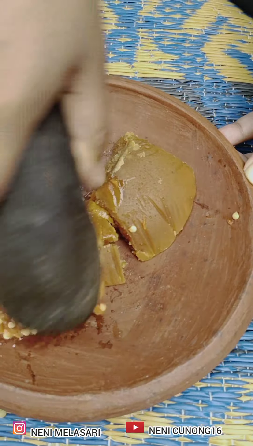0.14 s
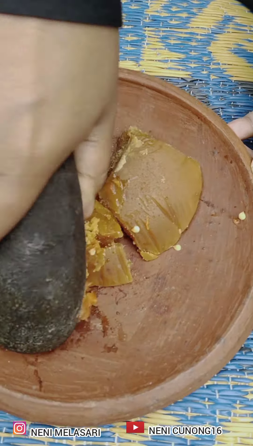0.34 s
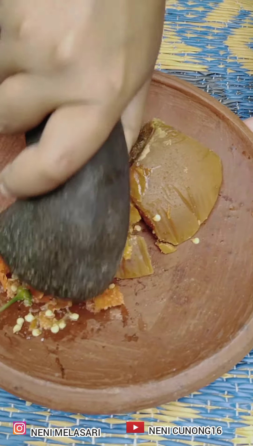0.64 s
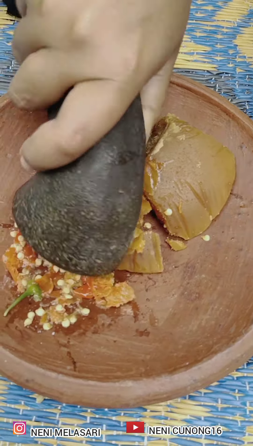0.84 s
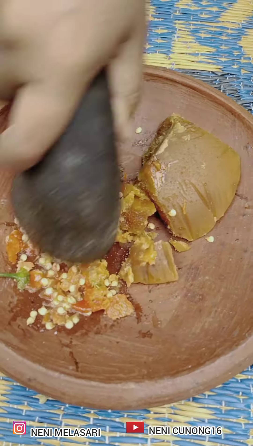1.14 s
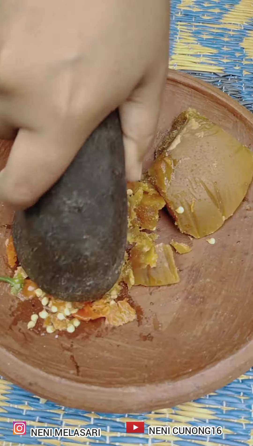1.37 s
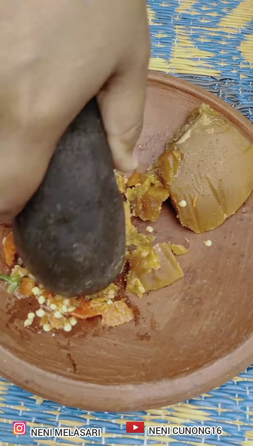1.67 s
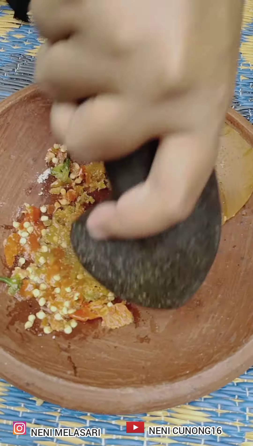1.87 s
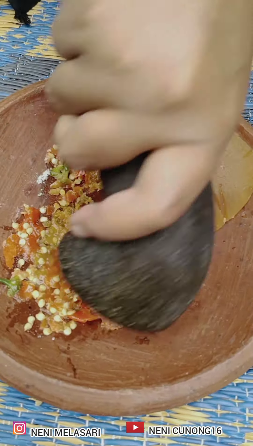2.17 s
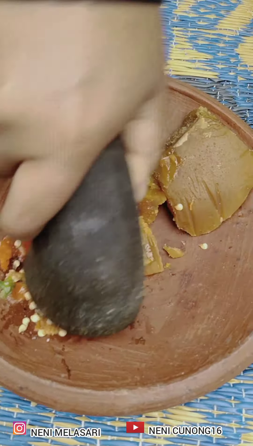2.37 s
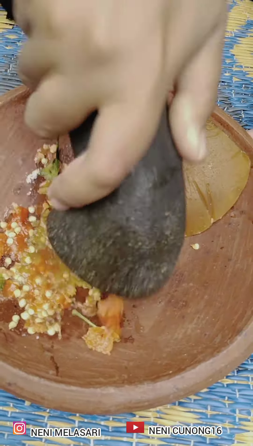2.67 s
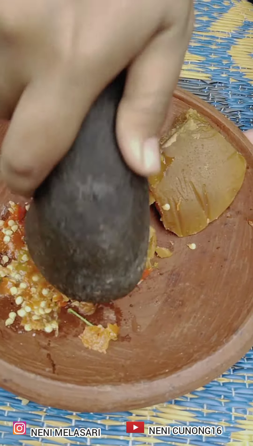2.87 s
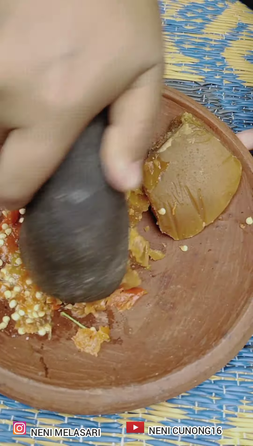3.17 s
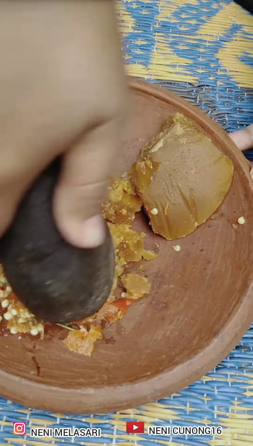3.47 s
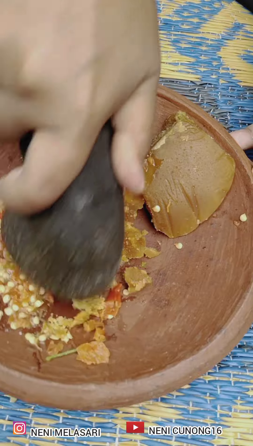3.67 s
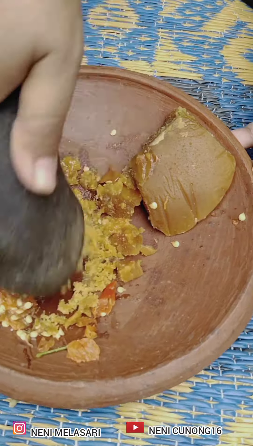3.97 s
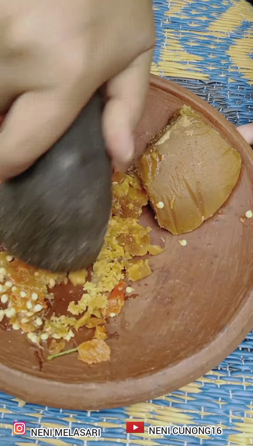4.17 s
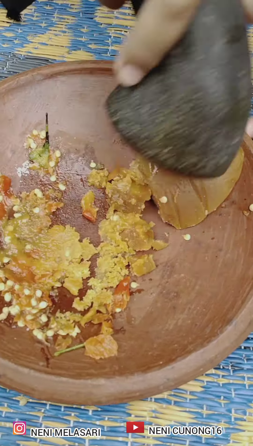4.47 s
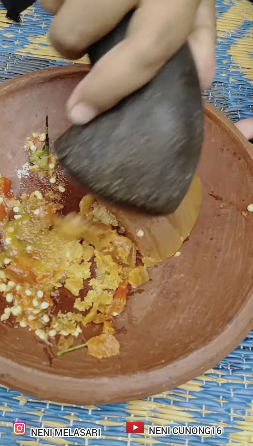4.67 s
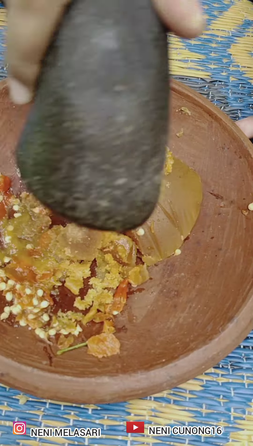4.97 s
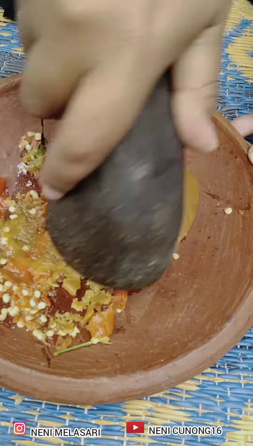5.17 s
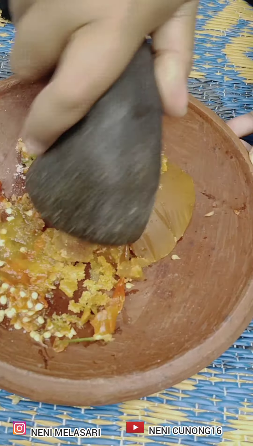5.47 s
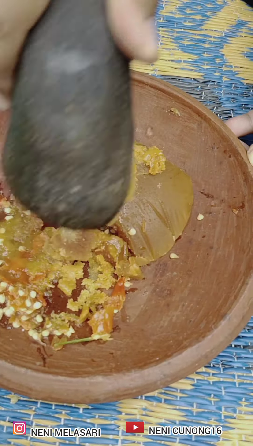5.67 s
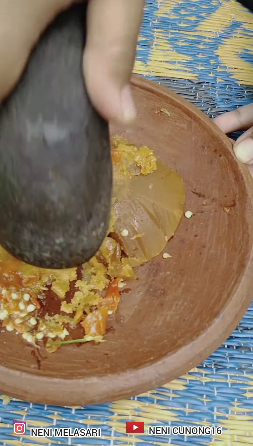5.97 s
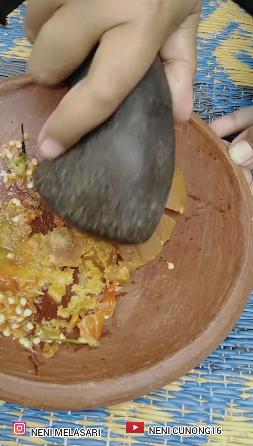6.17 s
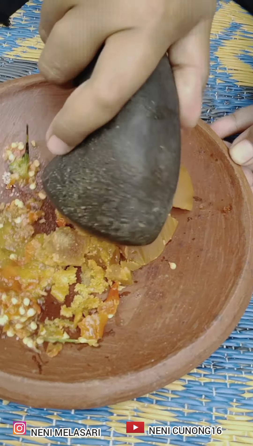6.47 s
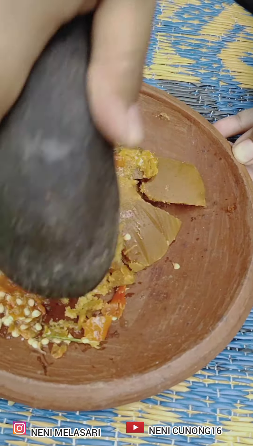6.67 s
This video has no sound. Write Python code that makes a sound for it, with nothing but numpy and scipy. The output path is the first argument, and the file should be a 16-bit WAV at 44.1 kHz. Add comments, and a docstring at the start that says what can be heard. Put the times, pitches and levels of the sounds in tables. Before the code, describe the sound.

Close up in a small, fairly dry room, a stone pestle works food in a shallow clay mortar over a soft low rumble and faint hiss. From 0 to 2.5 seconds it makes short, gritty, uneven scrapes and rubs, with small ticks and crunching grains, strongest around 1.2 to 1.7. A thin, rough animal cry sounds very faintly far away at about 0.5 to 0.9. At 2.8 a sharp, bright clay knock stands out, with a weaker one at 3.1. Scraping returns from 3.1 to 4.3, crunchier near 3.8, then a brief scrape at 4.7. Five hard, dead, abrupt knocks follow at 5.2, 5.5, 5.9, 6.2 and 6.6, the loudest overloading slightly, each with a tiny room reflection and near quiet between. Barely audible soft distant tones drift around 2.9, 3.9 and 5.4 to 6.2 seconds.

```python
"""A stone pestle crushes chilli, seeds and palm sugar in a shallow clay mortar, close to the microphone.
Blows set the damped modes of the dish ringing; gritty strokes are random grains that excite the same modes.
Late on, the pestle pounds a lump with five hard, dead knocks that overload the microphone.
A small room answers with filtered noise; behind it lie a low rumble and faint hiss, both shaped noise.
Far away an animal calls once, a rough tone with one overtone, and a few soft sine tones sound."""
import sys
import numpy as np
from scipy import signal
from scipy.fft import rfft, irfft
from scipy.io import wavfile

SR = 44100
rng = np.random.default_rng(int(sys.argv[2]) if len(sys.argv) > 2 else 0)


def store_wav(level_fs):
    """Save 16-bit WAV to argv[1]."""
    pcm = np.round(np.clip(np.atleast_2d(level_fs), -1, 1) * 32767)
    wavfile.write(sys.argv[1], SR, pcm.T.astype(np.int16))


N = 301644


def pounding(lead_in_rise_s=0.0032, lead_in_db=-26.5):
    """All blows of the pestle; a faint noise swells briefly before each."""
    # Blows of the pestle. Each row: start in seconds, length of the crunch in seconds, strength in dB,
    # hardness in dB per octave, pitch in Hz that the struck spot favours or mutes, by how much in dB,
    # note left ringing in Hz, its level in dB.
    blows = [(0.289, 0.0061, -54.5, 1.5, 5900, 16, 3850, -48),
             (0.3011, 0.0027, -47, -2.5, 2130, 16, 2410, -32),
             (2.495, 0.0054, -46, 2.7, 5940, 11, 3830, -40),
             (2.7964, 0.0076, -28, -1.5, 3570, -5.5, 2165, -12),
             (2.811, 0.0023, -22.5, -2, 620, -22.5, 3920, -24),
             (3.0986, 0.0026, -34, -.5, 1290, -4, 4000, -33),
             (3.105, 0.0084, -35, -0.9, 2000, -5.5, 3940, -15.5),
             (3.1357, 0.00039, -47, -3.5, 1290, 11, 1410, -33),
             (3.7367, 0.0045, -35, 6.5, 596, -15, 3950, -36), (4.026, 0.0013, -54, 8, 2640, -22, 3950, -50),
             (4.6091, 0.0067, -47.5, -2, 1090, 15, 1476, -38),
             (4.6179, 0.0018, -55, -2, 1000, 10, 600, -42),
             (5.1646, 0.0038, -25, -2.36, 556, 2.5, 2390, -25),
             (5.5224, 0.0022, -19.5, -2.5, 920, -9.5, 1703, -10),
             (5.886, 0.0028, -26, -4.5, 2600, -8, 1140, -34),
             (6.2373, 0.0032, -21, -1.5, 1470, 4, 1813, -19),
             (6.5683, 0.0023, -20, -1, 5000, -8.5, 1820, -8.5),
             (6.6215, 0.0026, -55, -3, 1560, 7, 2060, -49)]
    out = np.zeros(N)
    ahead = np.arange(SR // 100)[::-1] / SR  # time left before the stone lands
    for s, *touch in blows:
        lead_in = rng.standard_normal(len(ahead)) * np.exp(-ahead / lead_in_rise_s)
        landing = ahead == 0
        force = landing + amp(lead_in_db) * lead_in / np.linalg.norm(lead_in)
        add(out, s - ahead[0], signal.fftconvolve(blow(*touch), force))
    return out


def blow(crunch_s, strength_db, hardness, spot_hz, spot_db, note_hz, note_db,
         crack_db=-1, push_db=-3, grip=0.55, passes=3):
    """A push, a crunch of contact and the short ring of the dish; bare clay makes it bright, food dull."""
    # Contact noise. Each row: frequency in Hz, relative level in dB per Hz.
    crack = [(60, -45), (150, -2), (400, -6), (1000, -8.5), (3000, 0), (4600, 2.5), (6000, -5), (9000, -9)]
    # Food softens the top of every blow. Each row: frequency in Hz, gain in dB.
    cushion = [(9000, 13.5), (11000, -19), (15500, -19)]
    # Colour shared by all blows. Each row: frequency in Hz, relative level in dB.
    blow_colour = [(400, 0), (750, -5), (1100, 3.5), (1760, -2), (2300, 0.5), (2900, 2.5), (3400, -3),
                   (3950, 5), (4700, -2.5), (7000, -7)]
    pivot_hz, spot_octaves = 1620, 0.86  # hardness tilts about this pitch; width of the spot's emphasis
    note_rise_s, note_t60_s = 0.0033, 0.04

    t = np.arange(SR // 8) / SR
    u = t / max(crunch_s, 1 / SR)
    grit = band(rng.standard_normal(len(t)), 800, 14000, order=2)
    crunch = evened(grit * np.sqrt(u) * np.exp(-1.5 * u))
    push = evened(1. * (t == 0))
    contact = colour(amp(push_db) * push + amp(crack_db) * crunch, crack)
    ring = dish(t, spread_db=2, grip=grip)
    sound = colour(band(ring + contact, 140, 20000, order=2), cushion)

    hz, colour_db = np.transpose(blow_colour)
    spot = np.exp(-(np.log2(hz / spot_hz) / spot_octaves) ** 2)
    levels_db = strength_db + colour_db + hardness * np.log2(hz / pivot_hz) + spot_db * spot
    edges_hz = [150, 650, 850, 1550, 2000, 2550, 3200, 3600, 4300, 5200, 11000]
    attack = round(.008 * SR)
    for _ in range(passes):  # each pass brings the registers closer to their strength during the attack
        now_db = []
        for lo_hz, hi_hz in zip(edges_hz, edges_hz[1:]):
            power = np.mean(band(sound[:attack], lo_hz, hi_hz) ** 2)
            now_db.append(10 * np.log10(power))
        sound = colour(sound, list(zip(hz, levels_db - now_db)))

    swell_in = 1 - np.exp(-(t / note_rise_s) ** 2)
    note = swell_in * np.exp(-np.log(1000) * t / note_t60_s) * np.sin(2 * np.pi * note_hz * t)
    return sound + amp(note_db) * note


def dish(t, spread_db, grip=0, whole_hz=1600, detune=0, hold=1):
    """The dish's damped modes answer one touch; a pestle pressed down chokes the high ones."""
    # Modes of the clay dish, damped by food and mat. Each row: frequency in Hz before detuning,
    # relative level in dB, t60 in seconds before hold and grip act on it.
    modes = [(312, -18.5, 0.011), (548, 1.5, 0.012), (686, -20, 0.014), (970, 3, 0.011),
             (1199, -1.5, 0.016), (1470, 0, 0.015), (1747, -1, 0.032), (2154, -1.5, 0.025),
             (2390, 5.5, 0.013), (2750, -3.5, 0.037), (2895, 5, 0.017), (3120, -28, 0.0083),
             (3566, -10, 0.012), (3940, -1, 0.014), (4091, -2.5, 0.015), (4420, -8, 0.013),
             (4686, -12.5, 0.018), (4990, -5, 0.0094), (5404, -23.5, 0.019), (5730, -5.5, 0.012),
             (6270, -11.5, 0.0058), (6720, -11, 0.0063), (8210, -17.5, 0.0027)]
    hz, db, t60 = np.transpose(modes)[:, :, None]
    signs = rng.choice([-1, 1], hz.shape)
    shape = signs * amp(spread_db * rng.standard_normal(hz.shape))  # each mode's swing at this spot
    shape = np.where(hz < whole_hz, 1, shape)  # the lower modes move the whole bottom together
    hz = hz * (1 + detune * rng.standard_normal(hz.shape))
    decay = np.log(1000) / (t60 * hold) * (1 + grip * (hz / 4000) ** 2)
    ringing = shape * amp(db) * np.exp(-decay * t) * np.sin(2 * np.pi * hz * t)
    return evened(ringing.sum(0))


def grinding(grains_per_s=3200, size_db=2.5, judder_db=0.54, dry_db=-23, spots_per_s=22, usual_hiss_db=-13,
             brighten=0.25, usual_grit_db=-15, deepen=0.33, low_db=-6, high_db=-1, grit_db=-1, hiss_db=-1,
             count=16):
    """Grains catch and break under the stone; the ring of the dish shifts as the pestle travels over it."""
    # Force of the grains. Each row: frequency in Hz, relative level in dB per Hz.
    grain_force = [(300, -20.5), (800, -5.5), (1800, -9), (3000, -1.5), (4100, 17.5), (5500, 5.5),
                   (9000, 18.5), (10500, -1), (12000, -32), (14500, -13)]
    # Hard bits crushed under the stone. Each row: centre in seconds, half length in seconds, level in dB.
    crunches = [(3.821, 0.021, -40.5), (3.944, 0.015, -42)]
    t = np.arange(N) / SR
    level, hiss, coarse = friction()

    judder = amp(judder_db * evened(band(rng.standard_normal(N), 13, 150, order=2)))
    sizes = amp(size_db * np.minimum(rng.exponential(1, N), 5)) * rng.choice([-1, 1], N)
    caught = rng.random(N) < grains_per_s / SR
    grains = sizes * caught * judder

    spot = (t * spots_per_s + rng.random(N)).astype(int) % count  # each spot hands over to the next
    ring = np.zeros(N)
    for k in range(count):
        touch = dish(t[:SR // 20], spread_db=4.5, whole_hz=3050, detune=.009, hold=1.8)
        answer = evened(colour(touch, grain_force))
        ring += signal.oaconvolve(grains * (spot == k), answer)[:N]
    rub = evened(ring) + amp(dry_db) * evened(colour(grains, grain_force))

    fine_db = brighten * np.clip(hiss - level - usual_hiss_db, -12, 12)  # finer grains excite the low modes less
    deep_db = deepen * (coarse - level - usual_grit_db)  # coarser grains excite them more
    grit = amp(coarse + grit_db)
    for s, half_s, db in crunches:
        grit = grit + amp(db) * np.exp(-((t - s) / half_s) ** 2)
    return (grit * evened(band(rub, 450, 2510))
            + amp(level + low_db - fine_db + deep_db) * evened(band(rub, 2005, 3090))
            + amp(level + high_db) * evened(band(rub, 2306, 5700))
            + amp(hiss + hiss_db) * evened(band(rub, 6840, 14000)))


def friction(step=32):
    """Levels in dB of scrape, hiss and grit: each push bites, swells or eases, and lifts; short ticks stand out."""
    # Pushes of the pestle over the food. Each row: start in seconds, length in seconds, scrape in dB,
    # growth from start to end in dB, then fine hiss and coarse grit, both in dB over the scrape.
    strokes = [(0.0, 0.011, -39, -8, -19, -23), (0.055, 0.013, -48.5, 2, -12.5, -32),
               (0.315, 0.056, -52.5, -5, -10, -1.5), (0.358, 0.038, -36.5, -2, -15, -20.5),
               (0.481, 0.036, -42.5, 11, -8, -15), (0.57, 0.094, -52.5, 2, -19, -17),
               (0.712, 0.031, -39, 8, -17, -10.5), (0.76, 0.051, -43.5, -12, -15, -7.5),
               (0.894, 0.032, -39.5, 3, -17, -18.5), (0.958, 0.16, -43.5, -7.5, -14.5, -13.5),
               (1.205, 0.02, -47.5, 11, -7, -15), (1.243, 0.066, -37, 1, -17, -15.5),
               (1.325, 0.15, -38, -2, -17, -16.5), (1.534, 0.041, -33, 13, -17.5, -20.5),
               (1.618, 0.064, -35, 3, -18, -19), (1.708, 0.084, -50.5, -18, -11, -35),
               (1.97, 0.0039, -44, 10, -23, -10.5), (2.017, 0.04, -44.5, -2, -19, -7),
               (2.167, 0.13, -45, -1, -25, -11.5), (2.374, 0.027, -54, 2, -13, -3.5),
               (2.458, 0.04, -46.5, 21, -17, -11.5), (3.134, 0.052, -46.5, -8, -15, -10),
               (3.234, 0.059, -46, 5, -17, -11), (3.365, 0.035, -44, -5.5, -18, -8),
               (3.427, 0.085, -45, 6, -13, -8.5), (3.679, 0.064, -43.5, 6, -17, -19),
               (3.755, .08, -38, 1, -17, -15.5), (3.877, .14, -43, -1.5, -11.5, -12),
               (4.103, 0.065, -35.5, 5, -14, -15.5), (4.21, 0.081, -36.5, 7, -13, -12.5),
               (4.661, 0.032, -43.5, 4, -12.5, -8.5), (4.715, 0.034, -31, 3, -20.5, -14),
               (4.775, 0.065, -51.5, 3, -29, -7), (5.215, 0.045, -50.5, 1, -38, -7),
               (6.589, 0.058, -59.5, -4, -30, 12.5)]
    # Brief ticks and sharp starts of pushes. Each row: time in seconds, scrape in dB, fine hiss in dB.
    ticks = [(0.014, -49, -43), (0.478, -40.5, -61), (0.542, -41, -52), (0.615, -57, -46.5),
             (1.206, -44, -46), (1.294, -28.5, -61), (1.536, -32, -45), (2.016, -33, -61),
             (2.457, -38.5, -58), (2.539, -40.5, -59), (3.365, -39.5, -73), (3.544, -41, -57.5),
             (3.679, -44, -53), (4.676, -34, -54)]
    bite_s, lift_s = 0.012, .015  # the scrape builds before a push and dies after it
    tick_rise_s, tick_fall_s = 0.0018, 0.013
    t = np.arange(0, N, step) / SR
    resting_db = [[-69], [-77], [-77]]  # the stone never quite stops moving in the food
    power = amp(resting_db) ** 2 * np.ones(len(t))
    for s, length, db, growth_db, hiss_db, grit_db in strokes:
        progress = np.clip((t - s) / length, 0, 1) - .5
        pressure = amp(db + growth_db * progress) * swell(t, s, length, bite_s, lift_s)
        power += (amp([[0], [hiss_db], [grit_db]]) * pressure) ** 2
    for s, db, hiss_db in ticks:
        power[:2] += (amp([[db], [hiss_db]]) * swell(t, s, 0, tick_rise_s, tick_fall_s)) ** 2
    return [np.interp(np.arange(N) / SR, t, 10 * np.log10(p)) for p in power]


def hiss_bands(rise_s=0.01, fade_s=0.033, width=0.07):
    """Short narrow bands of hiss, made of band-passed noise, linger after some blows and strokes."""
    # Short narrow bands of hiss. Each row: start in seconds, length in seconds, centre pitch in Hz, level in dB.
    rows = [(2.838, 0.12, 6720, -61.5), (2.841, 0.034, 2390, -57.5), (4.786, 0.029, 2510, -51),
            (5.54, 0.033, 1700, -55), (6.293, .07, 6500, -62), (6.595, 0.034, 2010, -51)]
    t = np.arange(N) / SR
    out = np.zeros(N)
    for s, length, hz, db in rows:
        hiss = evened(band(rng.standard_normal(N), hz / (1 + width), hz * (1 + width), order=3))
        out += amp(db) * swell(t, s, length, rise_s, fade_s) * hiss
    return out


def room(x, tail_db=-25, echo_db=-17, hollow_db=-42):
    """Near wall echoes, a faint tail that fades at its own rate in each register, and a hollow ring."""
    # Decay of the room's tail. Each row: frequency in Hz, t60 in seconds.
    tail_t60 = [(150, 0.23), (600, 0.063), (2000, 0.29), (5000, 0.27), (10000, 0.37)]
    wall_s, echo_s = .007, .008  # delay of the room's answer; time constant of the early echoes
    hollow_hz, hollow_t60_s = 572, .22
    t = np.arange(SR // 2) / SR
    hz, frame_s, z = signal.stft(rng.standard_normal(len(t)), SR, nperseg=256)
    fading = np.exp(-np.log(1000) * frame_s / read(tail_t60, hz)[:, None])
    tail = signal.istft(z * fading, SR)[1][:len(t)]
    early = rng.standard_normal(len(t)) * np.sqrt(t) * np.exp(-t / echo_s)
    hollow = np.sin(2 * np.pi * hollow_hz * t) * np.exp(-np.log(1000) * t / hollow_t60_s)
    answer = amp(tail_db) * evened(tail) + amp(echo_db) * evened(early) + amp(hollow_db) * evened(hollow)
    answer = answer / np.sqrt(len(t))
    # Colour of the whole answer: frequency in Hz, gain in dB.
    answer = colour(answer, [(150, 0), (450, -8), (600, -3), (1700, 1), (2500, -5), (4000, -5),
                             (5100, 1), (6500, -7)])
    out = np.zeros(N)
    add(out, wall_s, signal.fftconvolve(x, answer))
    return out


def far_call(overtone_db=-9, waver=0.017, flutter_db=6):
    """A far animal's thin, rough cry with one overtone; pitch and level follow one arch."""
    start_s, length_s, level_db = .48, .39, -58.5
    end_hz, arch_hz = 1016, 145  # mean pitch at the ends, and its rise in the middle
    arch = np.sin(np.pi * np.clip((np.arange(N) / SR - start_s) / length_s, 0, 1))
    jitter, flutter = (evened(band(rng.standard_normal(N), 15, 90, order=2)) for _ in range(2))
    pitch_hz = (end_hz + arch_hz * arch) * (1 + waver * jitter)
    turn = 2 * np.pi * np.cumsum(pitch_hz) / SR
    level = amp(level_db + flutter_db * flutter) * np.sqrt(abs(arch))
    return level * evened(np.sin(turn) + amp(overtone_db) * np.sin(2 * turn))


def far_tones(fade_s=.025, waver=.012):
    """A few soft sine tones in the distance, wavering slightly together."""
    # Faint tones far off. Each row: start in seconds, length in seconds, mean pitch in Hz, peak level in dB.
    rows = [(2.907, 0.06, 360, -55), (3.913, 0.52, 644, -66), (5.37, 0.84, 592, -68),
            (5.7, 0.048, 343, -56)]
    t = np.arange(N) / SR
    wobble = evened(band(rng.standard_normal(N), 6.8, 40, order=2))
    clock = np.cumsum(1 + waver * wobble) / SR
    out = np.zeros(N)
    for s, length, hz, db in rows:
        out += amp(db) * swell(t, s, length, fade_s, fade_s) * np.sin(2 * np.pi * hz * clock)
    return out


def background(rumble_db=-45.5, air_db=-59.5):
    """Low rumble and a faint steady hiss, each a noise of fixed spectrum."""
    # Low rumble. Each row: frequency in Hz, relative level in dB per Hz.
    rumble = [(12, -75.5), (20, -19.5), (32, -33.5), (51, -11.5), (108, 0.5), (141, -7), (173, -5),
              (269, -17.5), (296, -16), (382, -28.5), (500, -29), (650, -41), (1100, -120)]
    # Faint hiss. Each row: frequency in Hz, relative level in dB per Hz.
    air = [(240, 3), (400, 4), (489, -10.5), (598, -8), (730, -7), (1490, -5.5), (1840, -10), (2430, -11),
           (3530, -12.5), (4380, -6), (6850, -23.5), (7750, -59), (9040, -13), (10100, -41), (16000, -37)]
    return amp(rumble_db) * noise(rumble) + amp(air_db) * noise(air)


def amp(db):
    """Decibels to gain."""
    return 10 ** (np.asarray(db) / 20)


def evened(x):
    """Scales to rms 1."""
    return x / np.sqrt(np.mean(x ** 2) + 1e-20)


def read(points, hz):
    """Reads a table on a log-frequency axis."""
    f, value = np.transpose(points)
    return np.interp(np.log(hz + 1), np.log(f + 1), value)


def add(mix, s, sound):
    """Mixes a sound in at time s."""
    part = mix[max(round(s * SR), 0):][:len(sound)]
    part += sound[:len(part)]


def swell(t, start, length, rise_s, fall_s):
    """Exponential attack, hold, exponential release."""
    return np.exp(np.minimum(t - start, 0) / rise_s - np.maximum(t - start - length, 0) / fall_s)


def colour(x, points, size=4096):
    """Causal minimum-phase filter with the given spectrum, so that attacks stay sharp."""
    log_gain = np.log(amp(read(points, abs(np.fft.fftfreq(size, 1 / SR)))))
    taps = np.fft.ifft(np.exp(np.conj(signal.hilbert(log_gain)))).real
    return signal.fftconvolve(x, taps[:size // 2])[:len(x)]


def band(x, lo_hz, hi_hz, order=4):
    """Band-pass."""
    sos = signal.butter(order, [lo_hz, min(hi_hz, SR / 2 - 1)], "band", fs=SR, output="sos")
    return signal.sosfilt(sos, x)


def noise(points):
    """Steady noise with the given spectrum, at rms 1."""
    gain = amp(read(points, np.fft.rfftfreq(N, 1 / SR)))
    return evened(irfft(rfft(rng.standard_normal(N)) * gain, N))


def scene():
    """Pestle and mortar in the room, with the distance behind."""
    mortar = pounding() + grinding()
    return (mortar + room(mortar) + hiss_bands() + far_call() + far_tones() + background())[None]


def record(dry, edge_hz=15900):
    """The microphone rounds off peaks near full scale, as in the hardest knocks; then the band limit."""
    clipped = dry / (1 + dry ** 8) ** (1 / 8)
    return signal.oaconvolve(clipped, signal.firwin(255, edge_hz, fs=SR)[None], "same")


dry = scene()
out = record(dry)
store_wav(out)
```